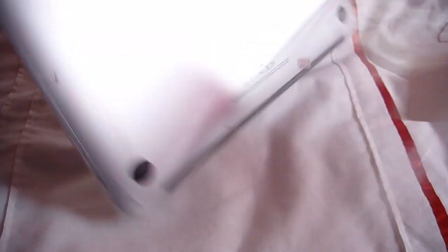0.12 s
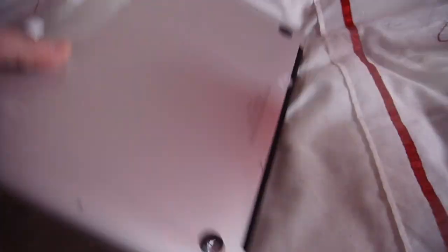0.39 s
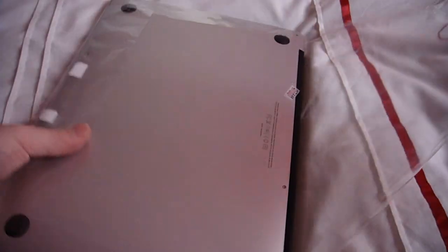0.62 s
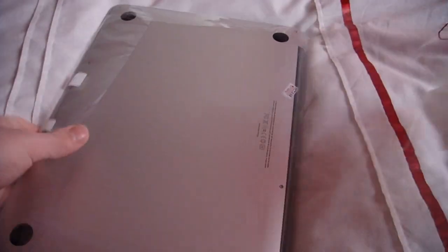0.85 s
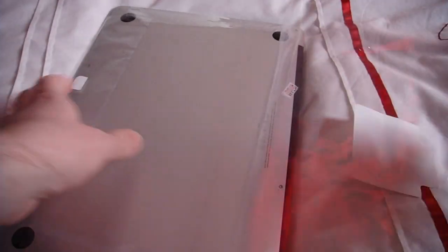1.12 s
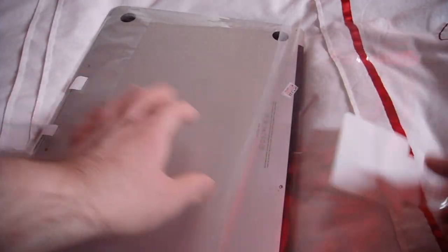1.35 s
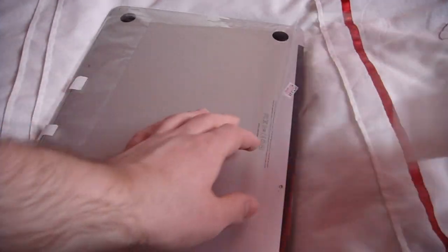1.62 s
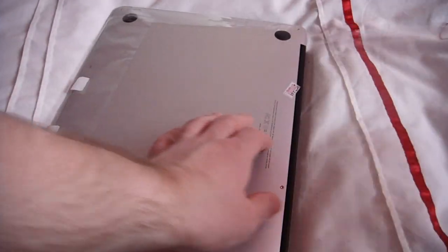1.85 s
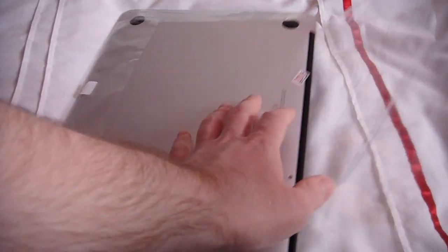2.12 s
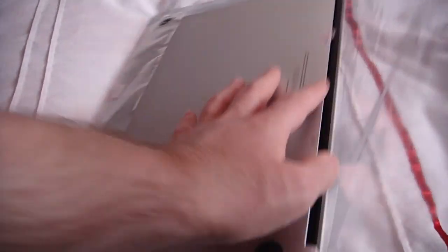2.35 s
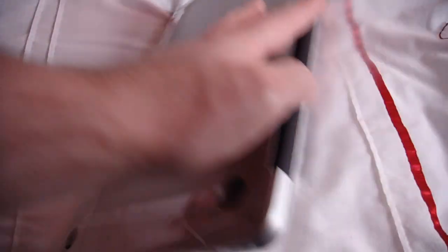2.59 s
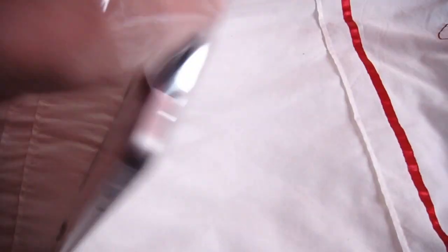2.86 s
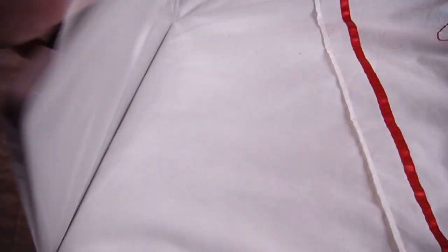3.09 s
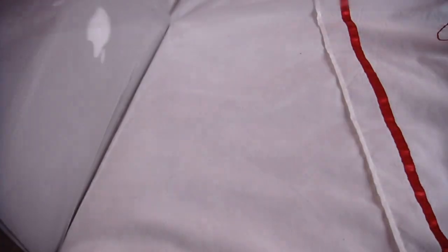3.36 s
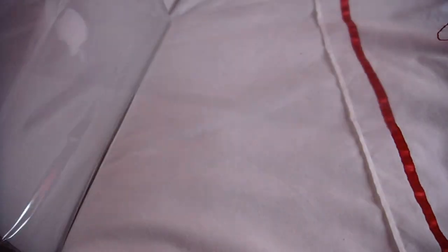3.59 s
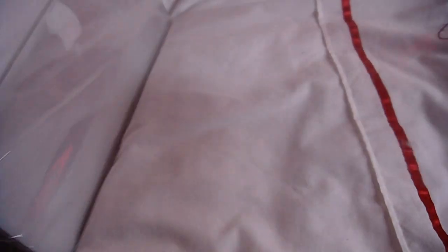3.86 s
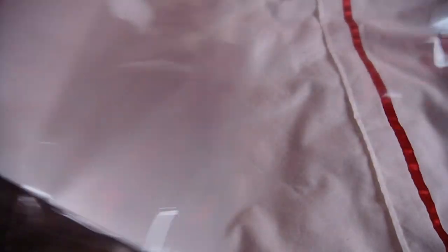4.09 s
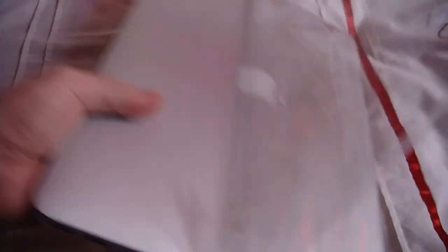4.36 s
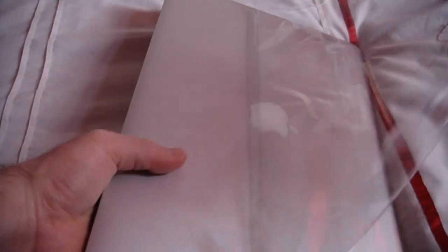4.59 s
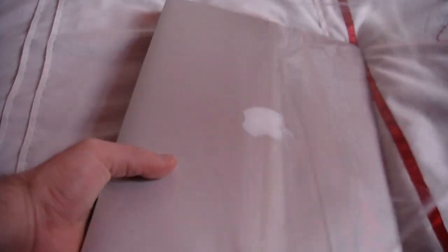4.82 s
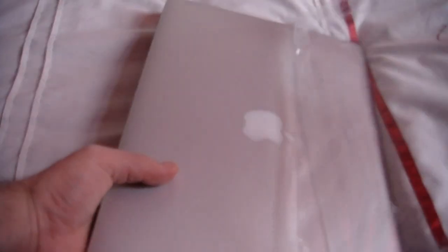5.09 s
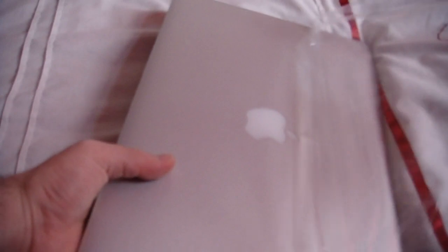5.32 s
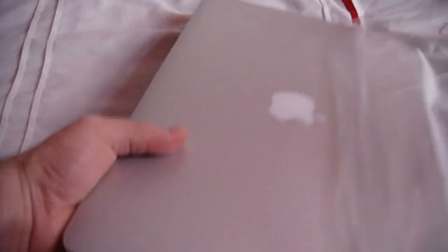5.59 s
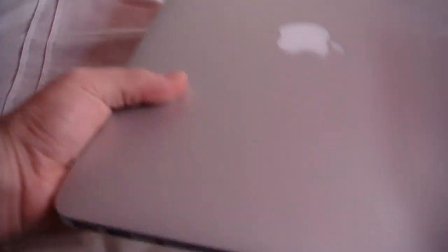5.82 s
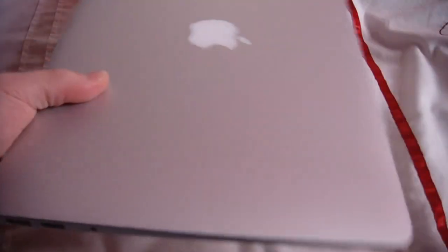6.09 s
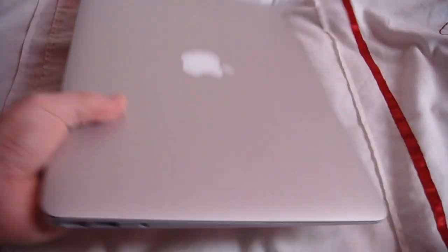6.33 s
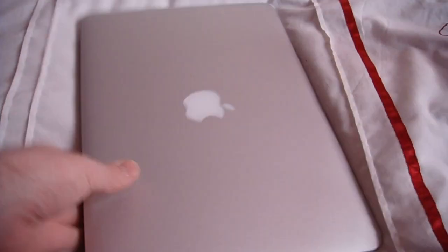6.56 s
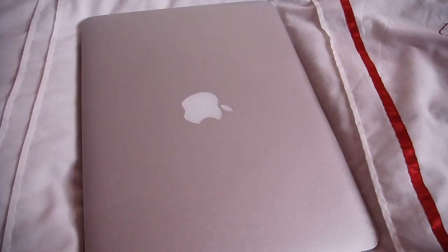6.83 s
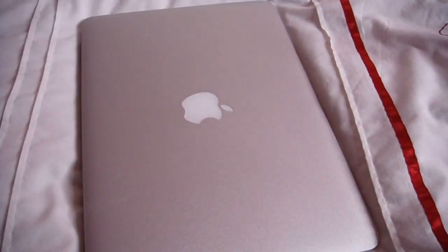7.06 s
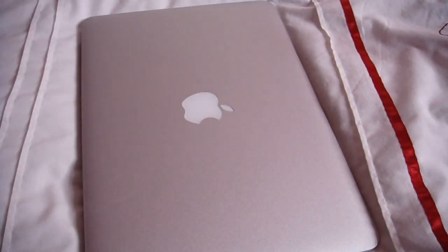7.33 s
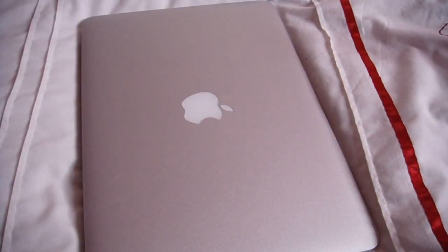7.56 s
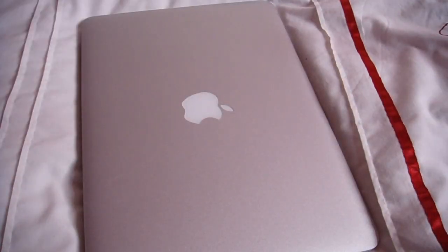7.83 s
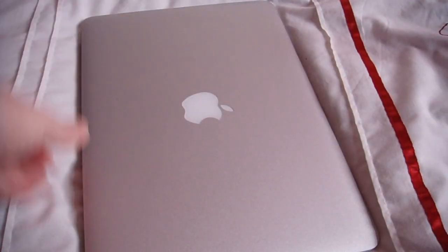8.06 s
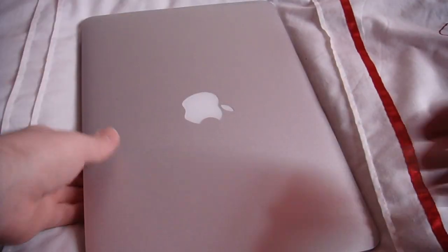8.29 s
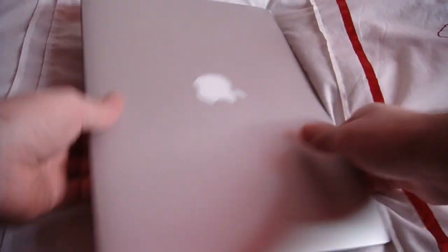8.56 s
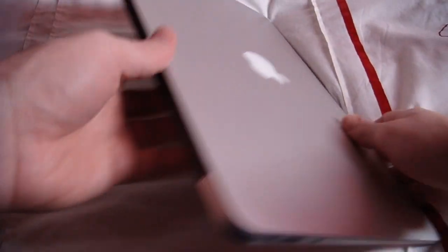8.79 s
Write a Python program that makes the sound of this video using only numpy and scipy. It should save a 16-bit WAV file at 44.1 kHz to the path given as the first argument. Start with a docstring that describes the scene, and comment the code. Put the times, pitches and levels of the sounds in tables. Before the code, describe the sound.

Clear film is handled on a bed: brisk crackles and swishes, a quieter gap, then a long busy run of hard snapping creases and strong hissing tugs. It thins out, dull low bumps land on the bedding, another crisp crumple follows and fades. Faint steady hiss lies beneath; sound is dry, close, bright and slightly distorted at the peaks.

```python
"""A thin clear plastic sleeve is handled and pulled off a laptop lying on a bed, close to a stereo microphone.
Creases buckle with short snaps made of noise bursts that ring two pitches; the loudest snaps overload.
The film hisses as countless tiny grains, crackles as finer noise bursts, and squeaks once as a rising tone.
Dull thuds and low lumpy noise come from the bedding, under faint steady hiss in a small, soft room."""
import sys
import numpy as np
from scipy import signal
from scipy.fft import rfft, irfft, next_fast_len
from scipy.io import wavfile

SR = 44100
rng = np.random.default_rng(int(sys.argv[2]) if len(sys.argv) > 2 else 0)


def put_to_file(sound):
    """Save the sound as 16-bit audio at rate SR, in the file named by the first command-line argument."""
    columns = np.atleast_2d(sound).T  # one column per channel
    safe = np.clip(columns, -1, 1)
    whole_steps = np.round(safe * 32767)
    wavfile.write(sys.argv[1], SR, whole_steps.astype(np.int16))


def natural_amplitude(level_db):
    """Convert a level in decibels to a linear amplitude factor, elementwise."""
    exponent = np.asarray(level_db, float) / 20
    return 10 ** exponent


N = 393813

# Resting touch on the film: fine near creases sound bright, broad far ones dull.
# Each row: time in seconds, rustle level in dB, treble against middle in dB (a tilt control).
RESTING_TOUCH = [(0.0, -67, 0), (0.289, -43.5, -7.5), (0.668, -44.5, 4), (1.117, -64, -11.5),
                 (1.347, -51, 1), (1.68, -58, 4.5), (2.305, -45, -6.5), (2.52, -63, 24), (2.854, -40, -8.5),
                 (3.05, -54, 2), (4.001, -53, 6), (4.22, -52, -7.5), (4.62, -50, 0), (5.02, -44, 6.5),
                 (6.4, -52, 4.5), (6.934, -69, -10.5), (7.613, -34.5, 8), (8.082, -44.5, -7),
                 (8.93, -48.5, 5)]
# Creases that buckle. Each row: start in seconds, height of the tallest swings in dB.
BUCKLING_CREASES = [(0.1282, -7), (0.1454, -14), (0.156, 0), (0.194, -4), (0.1983, -8.5), (0.2074, 1),
                    (0.2169, -2.5), (0.2552, -8), (0.2948, -1.5), (0.3214, -14), (0.4828, -10.5),
                    (0.5621, -20), (0.636, -14.5), (0.7831, -2.5), (0.7964, -19), (0.8145, -12),
                    (0.857, -11.5), (0.8882, -13), (0.9318, -20), (0.9495, -7.5), (1.1913, -11),
                    (1.276, -7.5), (1.4398, -6.5), (1.4955, -12.5), (1.5261, -2), (1.5928, -9),
                    (1.6356, -1), (1.6466, 1), (1.655, -12), (1.6609, -3), (1.666, -5), (1.6786, -6),
                    (1.6975, -21), (1.7467, -7.5), (1.7554, -5), (1.9014, -16), (1.9428, -22),
                    (2.0899, -11.5), (2.6532, -13), (2.792, -15), (2.811, -15), (2.824, -4.5),
                    (2.9485, -11), (3.0807, -22), (3.1812, -10.5), (3.2309, -7), (3.3344, -1),
                    (3.3443, 2.5), (3.4221, 2), (3.5139, -23), (3.5198, 3.5), (3.5311, -4.5), (3.5685, -9),
                    (3.5932, -11), (3.6114, 1), (3.6315, -5.5), (3.6493, -5), (3.6647, 5), (3.7178, -9.5),
                    (3.7435, -13), (3.7778, -1.5), (3.7973, -3), (3.8308, -2), (3.8465, -8), (3.8536, 5.5),
                    (3.869, -4), (3.8823, -4.5), (3.934, -7), (4.1327, -4), (4.15, 1.5), (4.2313, -21.5),
                    (4.2926, -21.5), (4.3175, -8), (4.3328, -1.5), (4.4628, -3), (4.5373, -15),
                    (4.5489, -13), (4.7045, -1.5), (4.7198, -6), (4.7397, -3), (4.757, -8), (4.778, 6),
                    (4.7848, 10), (4.7959, -1.5), (4.805, 1), (4.8371, -1), (4.849, 2.5), (4.8751, 7.5),
                    (4.8882, -1), (4.9327, -24), (5.0713, -7), (5.0874, -6), (5.1034, 0.5), (5.1162, 0.5),
                    (5.169, -16), (5.1776, -1), (5.219, 5.5), (5.2815, -4), (5.2961, 13.5), (5.3247, -2),
                    (5.3773, 9), (5.3851, 3.5), (5.417, -6), (5.4267, -2), (5.4624, -4), (5.5574, -11),
                    (5.5763, 7.5), (5.6268, -15), (5.6643, -15), (5.691, -21), (5.706, -15), (5.7135, -14),
                    (5.7234, -11.5), (5.8312, -5.5), (5.8834, -8), (5.9554, -19), (5.9757, 1), (6.0835, -2),
                    (6.2572, -10.5), (6.645, -12.5), (6.6708, -9), (6.8862, -26), (6.9456, -24.5),
                    (7.1362, -2), (7.1514, -0.5), (7.1895, -12), (7.2067, -12), (7.2209, -4), (7.3239, 0),
                    (7.3455, -2), (7.3667, -1.5), (7.4036, -7), (7.4989, 4.5), (7.6775, -4), (7.8905, -4.5),
                    (8.1433, -15.5), (8.3533, -9.5), (8.3654, -13.5), (8.4594, -19), (8.7465, -22.5),
                    (8.8394, -27)]
# Tugs on the sleeve. Each row: peak time in seconds, peak level in dB,
# seconds to swell by 20 dB, seconds to fade by 20 dB.
SLEEVE_TUGS = [(0.0, -28, .05, .15), (0.27, -19.5, .11, .07), (0.489, -38, .16, .5), (0.808, -29, .08, .42),
               (1.107, -38, .2, .07), (1.437, -36, .34, .17), (1.612, -25, .02, .03),
               (1.645, -24, .02, .15), (1.684, -17, .06, .04), (1.775, -22, .03, .12),
               (1.916, -37, .08, .33), (2.395, -45, .9, .1), (3.223, -32, .14, .1), (3.56, -31, .5, .4),
               (3.861, -24, .1, .11), (4.151, -26.5, .22, .1), (4.46, -37, .3, .2), (4.72, -25, .07, .3),
               (4.889, -24.5, .2, .15), (5.078, -15.5, .02, .085), (5.27, -30, .3, .4),
               (5.418, -20.5, .13, .125), (5.865, -14, .09, .13), (6.266, -40, .7, .08),
               (6.57, -36, .2, .1), (6.904, -38.5, .13, .19), (7.076, -15, .004, .2), (7.19, -21, .02, .4),
               (7.327, -21, .008, .4), (7.5, -18.5, .12, .3), (7.893, -24, .003, .25),
               (8.102, -31, .004, .25), (8.265, -38, .004, .15), (8.355, -28, .004, .14)]
# Colour of the film. Each row: pitch in Hz, gain in dB.
FILM_COLOUR = [(18, -47), (30, -9), (200, -7.5), (500, -5.5), (1000, 0.5), (3780, 1), (14000, -6)]
# The film moves across the front. Each row: time in seconds, lag of the left channel in samples.
LEFT_LAG_CURVE = [(0, .8), (1.6, 1.1), (3.1, 0), (3.8, .2), (4.3, 1), (7.3, 1.8), (8.9, .8)]
# Film squeaking under a finger. One row: start in seconds, length in seconds,
# first pitch in Hz, last pitch in Hz, level in dB.
FINGER_SQUEAK = (1.31, .09, 600, 1790, -42)
# A hand or the laptop lands on the bedding. Each row: start in seconds, level in dB before the decay.
LANDINGS = [(3.079, -31), (6.54, -31.5), (6.733, -29.5)]
# The laptop drags on the bedding as it is lifted. Each row: time in seconds, rumble level in dB.
DRAG_LEVEL = [(8.56, -77), (8.62, -45), (8.74, -48), (8.93, -50.5)]
# Dull resonances of the bedding. Each row: pitch in Hz, width in Hz, relative level in dB.
BEDDING_RESONANCES = [(90, 90, 0), (230, 70, -2)]
# Colour of the microphone and room noise. Each row: pitch in Hz, relative gain in dB.
HISS_COLOUR = [(24, -22), (40, 2), (582, 3.5), (1000, -3.5), (14000, -21.5)]


def rms_one(x):
    """Scale to an average (rms) strength of 1."""
    return x / np.sqrt(np.mean(x ** 2) + 1e-20)


def in_time(rows):
    """Columns of a curve table, joined by straight lines, at every sample."""
    seconds, *columns = np.transpose(rows)
    return [np.interp(np.arange(N) / SR, seconds, column) for column in columns]


def at_hz(points, hz):
    """Read the dB of a colour table at any pitch."""
    table_hz, table_db = np.transpose(points)
    return np.interp(np.log(hz + 1), np.log(table_hz + 1), table_db)


def coloured(x, points):
    """Make each pitch stronger or weaker as a colour table says."""
    size = next_fast_len(x.shape[-1])
    gain = natural_amplitude(at_hz(points, np.fft.rfftfreq(size, 1 / SR)))
    return irfft(rfft(x, size) * gain, size)[..., :x.shape[-1]]


def resonance(x, hz, width):
    """Ring at one pitch: a two-pole band, width in Hz, with gain 1 on top."""
    r = np.exp(-np.pi * width / SR)
    top = np.array([1, 0, -1]) * (1 - r * r) / 2
    bottom = [1, -2 * r * np.cos(2 * np.pi * hz / SR), r * r]
    return signal.lfilter(top, bottom, x + 1e-18)


def drift(rate_hz):
    """Slow random wandering of rms 1, made at every 40th sample and joined up."""
    r = np.exp(-80 * np.pi * rate_hz / SR)
    white = rng.standard_normal(N // 40 + 2002)
    slow = signal.lfilter([1], [1, -2 * r, r * r], white)[2000:]
    return np.interp(np.arange(N) / 40, np.arange(len(slow)), rms_one(slow))


def lags():
    """Whole samples by which sound reaches the left channel later; it wanders as the hands move."""
    wander = 0.28 * drift(2.4)
    jitter = 0.46 * rng.standard_normal(N)
    return np.round(in_time(LEFT_LAG_CURVE)[0] + wander + jitter).astype(int)


def steady_hiss():
    """Microphone and room noise: coloured random noise, separate in each channel."""
    level_db = -51.5
    return natural_amplitude(level_db) * rms_one(coloured(rng.standard_normal((2, N)), HISS_COLOUR))


def room(x):
    """Echoes in a small room: a short soft tail of fading noise, separate in each channel."""
    t60_s, level_db = 0.16, -20
    t = np.arange(int(t60_s * SR)) / SR
    tail = rng.standard_normal((2, len(t))) * natural_amplitude(-60 * t / t60_s) * (t > 0.003)
    tail *= natural_amplitude(level_db) / np.sqrt(np.sum(tail ** 2, axis=1, keepdims=True))
    return signal.fftconvolve(x, tail, axes=1)[:, :N]


def landings():
    """Soft bedding damps each landing: a dull 78 Hz thud that dies at once."""
    t, sound = np.arange(N) / SR, np.zeros(N)
    for start, level_db in LANDINGS:
        since = t - start
        fade = np.exp(-np.abs(since) / 0.009)
        sound += natural_amplitude(level_db) * (since > 0) * np.sin(2 * np.pi * 78 * since) * fade
    return sound


def bedding_drag():
    """Rubbing cloth makes lumpy noise, partly shared by the channels, in two dull resonances."""
    noise = rng.standard_normal(N) + 0.49 * rng.standard_normal((2, N))
    lumpy = natural_amplitude(2.4 * drift(30)) * noise
    drag = np.zeros((2, N))
    for hz, width, level_db in BEDDING_RESONANCES:
        band = resonance(resonance(lumpy, hz, width), hz, width)
        drag += natural_amplitude(level_db) * rms_one(band)
    return natural_amplitude(in_time(DRAG_LEVEL)[0]) * rms_one(drag)


def squeak():
    """Stick-slip of the film: a short tone of rising, wobbling pitch, rough with friction."""
    start, length, first_hz, last_hz, level_db = FINGER_SQUEAK
    part = np.clip((np.arange(N) / SR - start) / length, 0, 1)
    hz = first_hz * (last_hz / first_hz) ** part * (1 + 0.047 * drift(40))
    swell = np.sqrt(np.sin(np.pi * part).clip(0))
    roughness = 1 + 0.5 * drift(150)
    return swell * natural_amplitude(level_db) * roughness * np.sin(2 * np.pi * np.cumsum(hz) / SR)


def film_gain(hz, treble_db):
    """Colour of the film at one pitch, tilted by the treble control."""
    tilt = np.clip(np.log2(hz / 2500) / 3.44, -0.4, 1.2)
    return natural_amplitude(at_hz(FILM_COLOUR, hz) + tilt * treble_db)


def slide(treble_db):
    """Film slips over metal and skin: tiny grains each ring a patch whose size sets the pitch."""
    grains_per_s = 24000
    at = np.flatnonzero(rng.random(N) < grains_per_s / SR)
    size = natural_amplitude(2.0 * np.minimum(rng.exponential(1, N), 4)) * rng.choice([-1, 1], N)
    patch, lag = rng.integers(0, 16, N), lags()
    uneven, out = rng.standard_normal(N), np.zeros((2, N))
    for k, hz in enumerate(np.geomspace(50, 14000, 16)):
        mine, clicks = at[patch[at] == k], np.zeros((2, N))
        clicks[0, np.clip(mine + lag[mine], 0, N - 1)] = size[mine]
        # each grain's strength differs at random between the channels, most at low pitches
        clicks[1, mine] = size[mine] * (1 + min(0.8, 120 / hz) * uneven[mine])
        flicker = natural_amplitude(2.43 * drift(17))
        out += film_gain(hz, treble_db) * flicker * resonance(clicks, hz, hz / 2.4)
    return rms_one(out)


def crackle(per_s, treble_db):
    """Small creases give way in clumps: noise bursts of about a millisecond, each in a broad colour."""
    size = natural_amplitude(6 * np.minimum(rng.exponential(1, N), 2.0))
    born = (rng.random(N) < per_s / SR) * size
    crease, white, sound = rng.integers(0, 5, N), rng.standard_normal(N), np.zeros(N)
    r = np.exp(-1 / (0.00032 * SR))
    for k in range(5):
        hz = 1300 * 1.8 ** k
        swell = signal.lfilter([1], [1, -2 * r, r * r], born * (crease == k) + 1e-18)
        sound += film_gain(hz, treble_db) * resonance(white * swell, hz, hz * 0.92)
    # creases lie apart, so the left lag wanders quickly
    lag = np.round(in_time(LEFT_LAG_CURVE)[0] + 0.89 * drift(37)).astype(int)
    later = np.arange(N) - lag
    return rms_one(np.stack([sound[later.clip(0, N - 1)], sound]))


def jerks(per_s, fade_s, depth):
    """The film slips in jerks: sudden rises of random height that fade; the mean is near 1."""
    starts = (rng.random(N) < per_s / SR) * rng.random(N)
    rises = signal.lfilter([1], [1, -np.exp(-1 / (fade_s * SR))], starts)
    return (1 + depth * rises) / (1 + depth * rises.mean())


def effort_db(resting_db):
    """Tugs, and rustle after each snap, swell and fade at steady rates; powers add to the resting touch."""
    t = np.arange(0, N, 44) / SR   # every 44th sample is enough
    # a buckled crease goes on rustling 27 dB under its snap: swells in 5 ms, fades in 38 ms (per 20 dB)
    after = [(s, min(peak_db, 0) - 27, 0.005, 0.038) for s, peak_db in BUCKLING_CREASES]
    s, peak_db, swell_s, fade_s = np.transpose(list(SLEEVE_TUGS) + after)[:, :, None]
    away = np.where(t < s, (s - t) / swell_s, (t - s) / fade_s)
    power = natural_amplitude(2 * peak_db - 40 * away).sum(axis=0)
    return 10 * np.log10(natural_amplitude(resting_db) ** 2 + np.interp(np.arange(N) / SR, t, power))


def rustle():
    """Sliding hiss and crackle of the film; harder handling crackles faster and louder."""
    resting_db, treble_db = in_time(RESTING_TOUCH)
    level_db = effort_db(resting_db)
    effort = np.clip((level_db + 57.5) / 35, 0, 1)
    slip = jerks(per_s=70, fade_s=0.008, depth=0.8)
    hiss = natural_amplitude(0.6) * slip * slide(treble_db)
    fine = crackle((60 + 260 * effort) * slip ** 2, treble_db)
    # from 7.7 s the dropped sleeve settles further off, where single creases stand out less
    crackle_db = -0.6 - 8 * (np.arange(N) > 7.7 * SR)
    return natural_amplitude(level_db) * (hiss + natural_amplitude(crackle_db) * fine)


def snaps():
    """A buckling crease: a brief broad burst, ringing two modes of the panel beside it, higher when bright."""
    ring_hz, ring_spread_db = 3770, 3.0   # usual pitch and its scatter
    out, t = np.zeros((2, N + 2048)), np.arange(1024) / SR
    lag, treble_db = lags(), in_time(RESTING_TOUCH)[1]
    for start, peak_db in BUCKLING_CREASES:
        at = int(start * SR)
        white = rng.standard_normal(1024)
        long, high = rng.standard_normal(2)   # chance in length and pitch
        hz = np.clip(ring_hz * natural_amplitude(0.35 * treble_db[at] + ring_spread_db * high), 1000, 11000)
        swell = t / (0.00045 * natural_amplitude(1.53 * long + 0.063 * peak_db))
        # a swell of a millisecond or two, over a weak longer tail
        burst = white * (swell * np.exp(1 - swell) + 0.04 * np.exp(-t / 0.012))
        upper_mode = rms_one(resonance(burst, hz, hz / 3))
        lower_mode = rms_one(resonance(burst, hz / 2.12, hz / 7))
        sound = 0.49 * upper_mode + 0.2 * lower_mode + rms_one(burst)
        sound = signal.lfilter([1, -1], [1, -0.84], sound)   # a small crease radiates little bass
        sound *= natural_amplitude(peak_db) / np.sort(np.abs(sound))[-3]   # set by the third tallest sample
        out[0, at + lag[at]:at + lag[at] + 1024] += sound
        out[1, at:at + 1024] += sound
    return out[:, :N]


def scene():
    """The film and its echoes, over the bedding and the steady hiss."""
    film = rustle() + snaps() + squeak()
    return film + room(film) + landings() + bedding_drag() + steady_hiss()


def band_limit(x):
    """A steep low-pass at the top of the band."""
    return signal.sosfilt(signal.butter(12, 15510, fs=SR, output="sos"), x)


def record(dry):
    """The left channel is brighter; the top is cut at 14250 Hz, then peaks are clipped hard."""
    bright_left = coloured(dry[0], [(3500, 0.2), (15000, 3.6)])   # (Hz, dB)
    both = np.stack([bright_left, dry[1]])
    top_cut = signal.ellip(10, 0.5, 50, 14250, fs=SR, output="sos")
    mix = np.clip(signal.sosfilt(top_cut, both), -1, 1)
    return band_limit(mix)


dry = scene()
out = record(dry)
put_to_file(out)
```